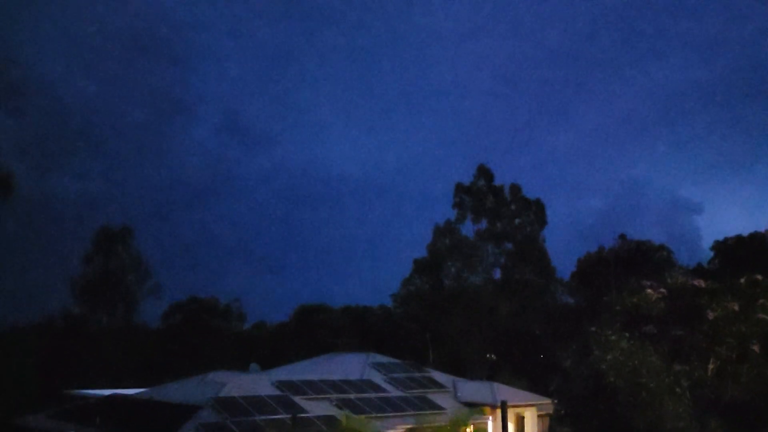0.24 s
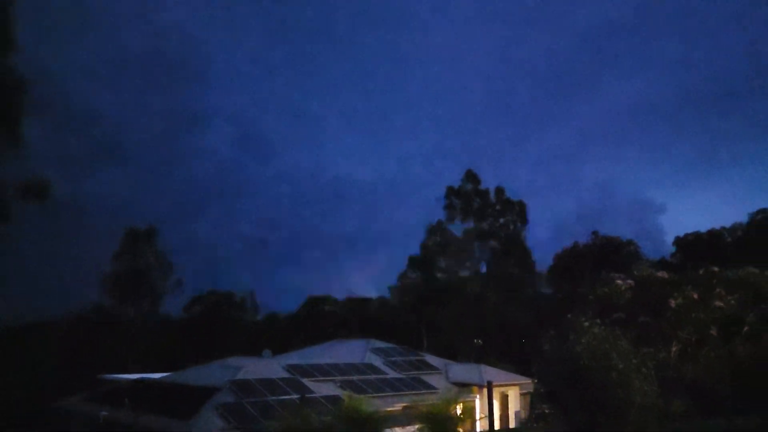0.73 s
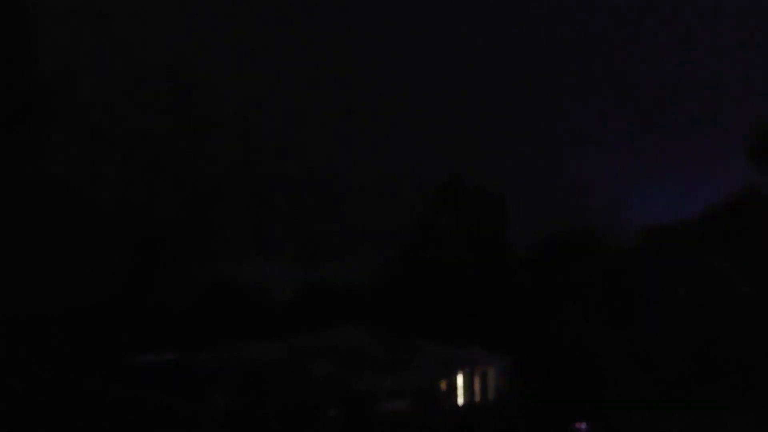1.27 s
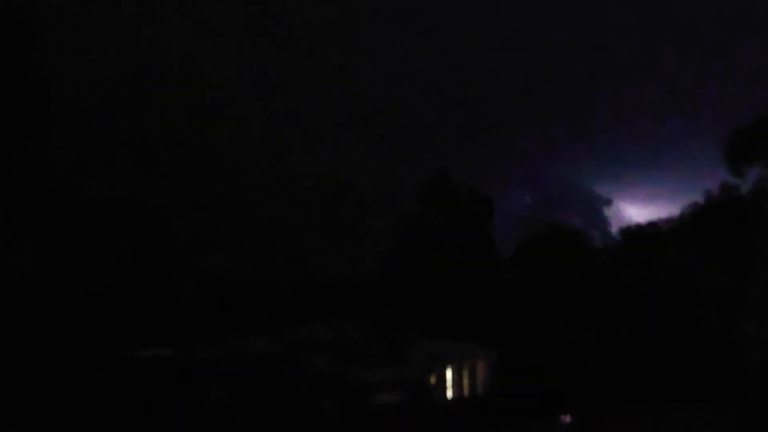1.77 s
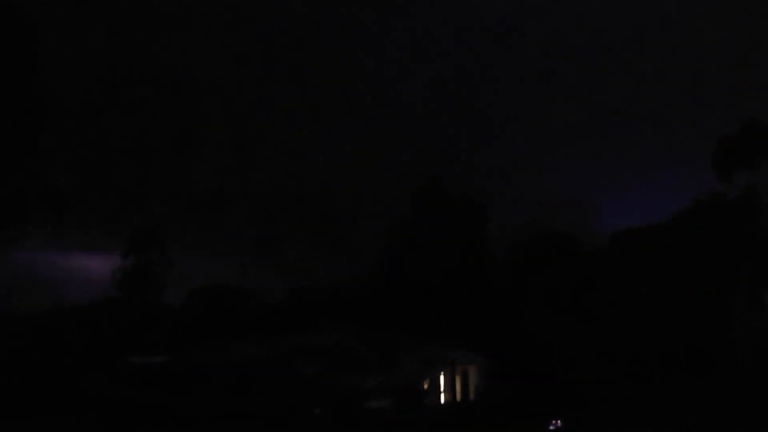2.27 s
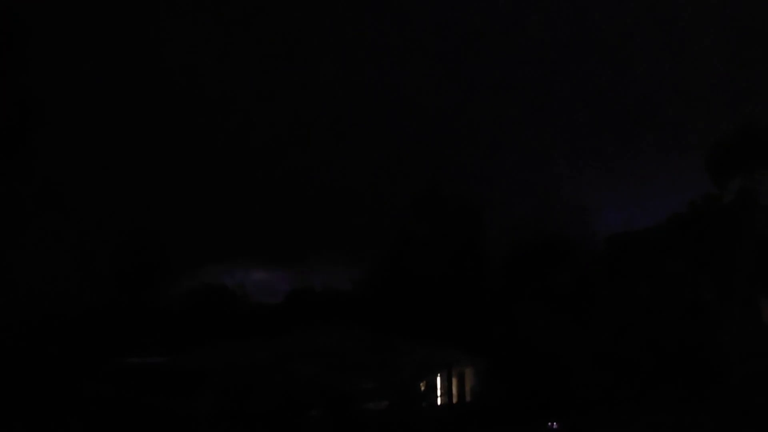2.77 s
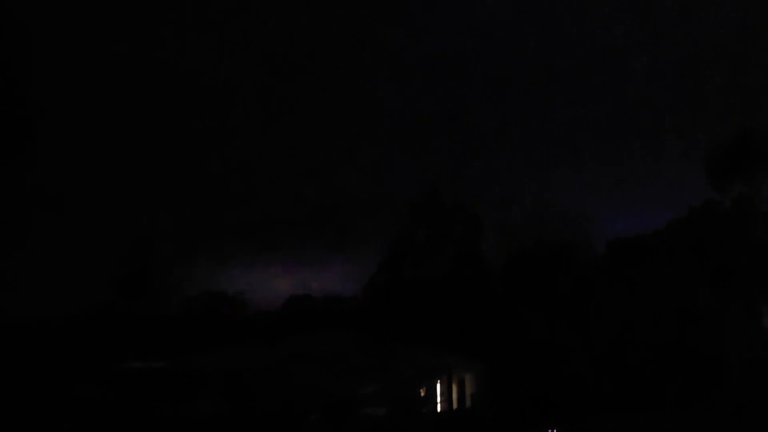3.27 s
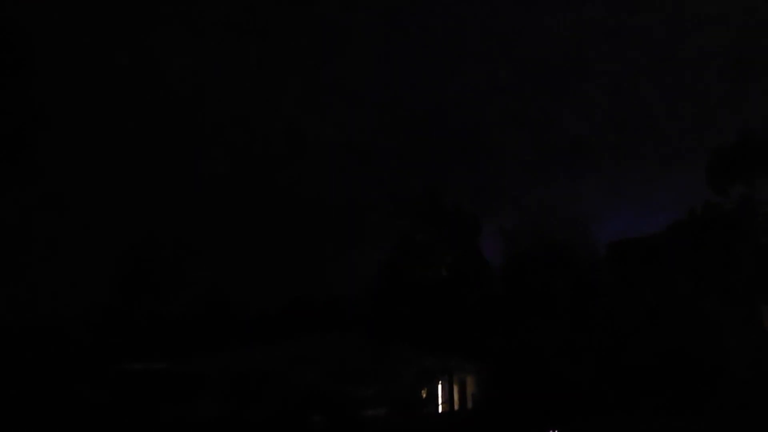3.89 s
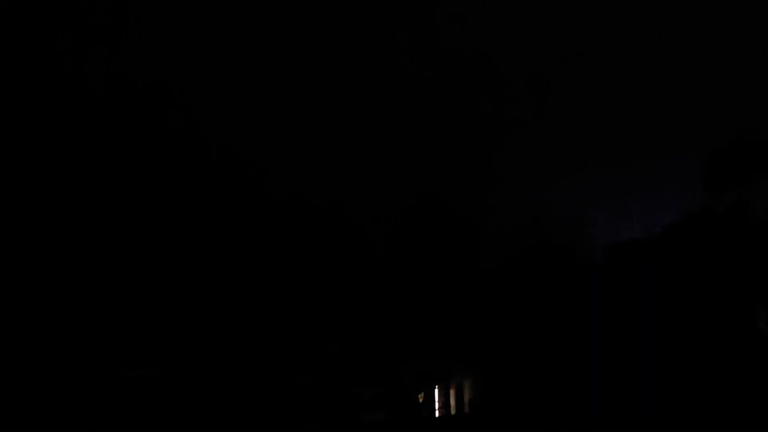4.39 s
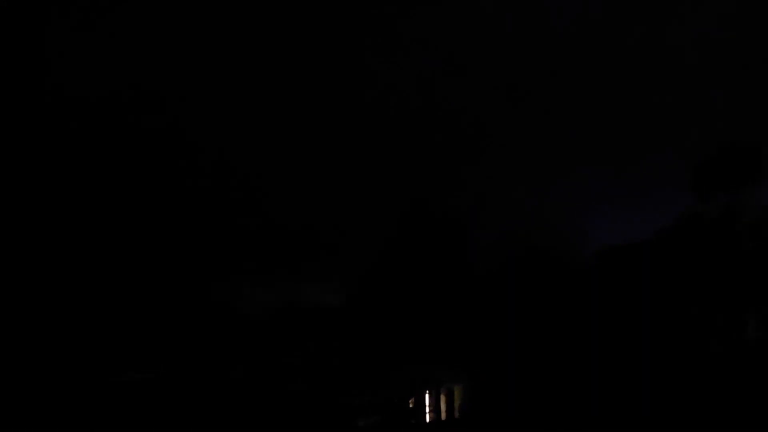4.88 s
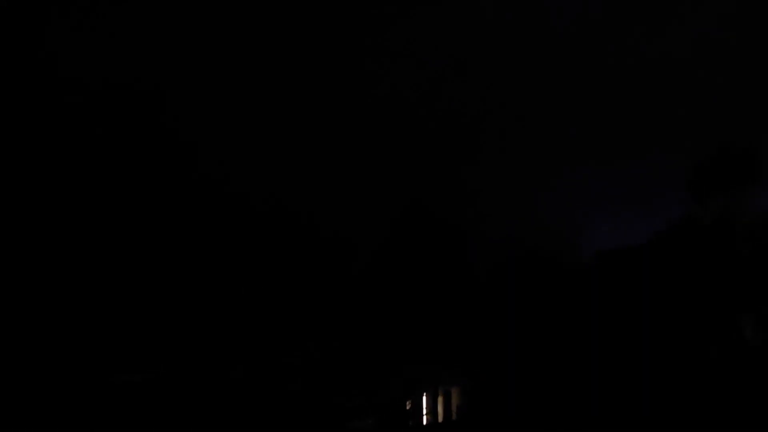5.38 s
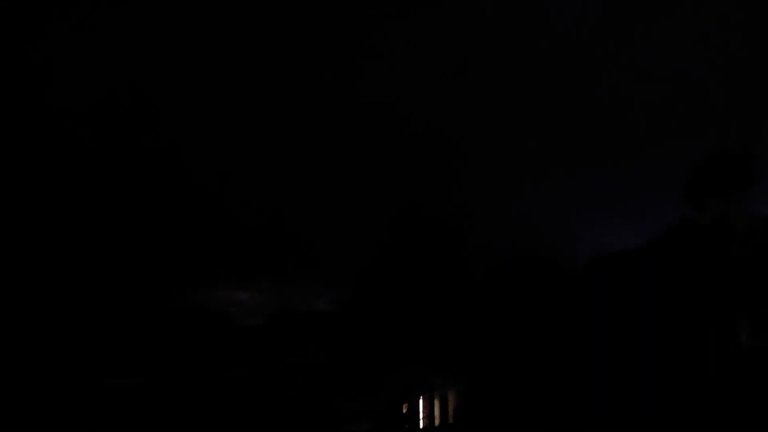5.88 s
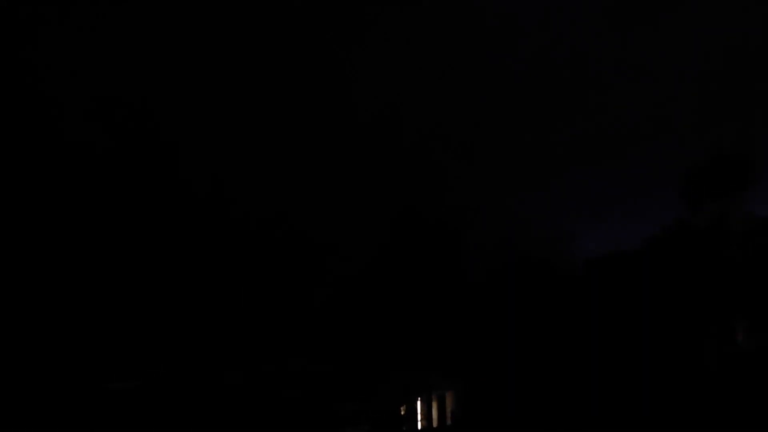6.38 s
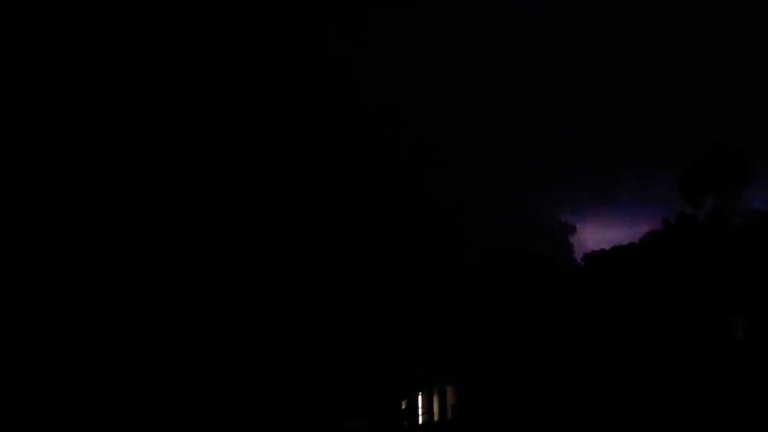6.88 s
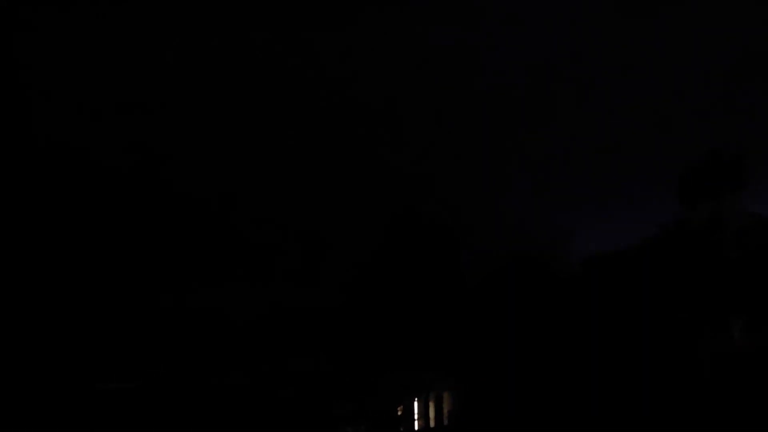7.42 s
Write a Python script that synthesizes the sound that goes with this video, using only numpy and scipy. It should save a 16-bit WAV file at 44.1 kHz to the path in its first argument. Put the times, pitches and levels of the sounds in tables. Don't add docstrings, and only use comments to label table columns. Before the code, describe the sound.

Outdoors at night, three near frogs trill dry falling whistles around 4 kHz, about fifteen chirps a second, with tiny hesitations. A far chorus fills in behind. Thunder rumbles low and continuous while wind thumps the hand-held microphone, harder on the right and strongest near the end. Cloth brushes, small knocks and a firmer bump past the middle come from handling. Insects hiss softly.

```python
import sys
import numpy as np
from scipy import signal
from scipy.io import wavfile
from scipy.ndimage import uniform_filter1d

SR = 44100
rng = np.random.default_rng(int(sys.argv[2]) if len(sys.argv) > 2 else 0)


def ratio_of_db(decibels):
    return 10 ** (np.asarray(decibels, float) / 20)


def transcribe(signal):
    frames = np.atleast_2d(signal).T
    limited = np.clip(frames, -1, 1)
    pcm = np.round(limited * 32767).astype(np.int16)
    wavfile.write(sys.argv[1], SR, pcm)


N = 337365


def evened(x):
    return x / np.sqrt(np.mean(x ** 2) + 1e-20)


def read(points, hz, order=1):
    rows = np.transpose(points)
    return np.interp(np.log(hz + 1), np.log(rows[0] + 1), rows[order])


def curve(rows, order=1):
    rows = np.transpose(rows)
    return np.interp(np.arange(N) / SR, rows[0], rows[order])


def swells(rows, rest_db):
    rise_share, edge_db = 0.46, -9.5
    t = np.arange(N) / SR
    power = ratio_of_db(2 * rest_db) * np.ones(N)
    for peak_s, db, length in rows:
        u = (t - peak_s) / (length * np.where(t < peak_s, rise_share, 1 - rise_share))
        power += ratio_of_db(2 * (db + edge_db * np.minimum(abs(u), 9) ** 1.35))
    return np.sqrt(power)


def add(mix, s, sound):
    part = mix[:, round(s * SR):][:, :sound.shape[1]]
    part += sound[:, :part.shape[1]]


def sides(pan_db):
    return ratio_of_db(np.array([[pan_db / 2], [-pan_db / 2]]))


def resonate(x, hz, width):
    turn = np.exp(2j * np.pi * np.cumsum(hz * np.ones(x.shape[-1])) / SR)
    r = np.exp(-np.pi * width / SR)
    return 2 * (turn * signal.lfilter([1 - r], [1, -r], x / turn)).real


def resonate_thrice(x, hz, width):
    return resonate(resonate(resonate(x, hz, width), hz, width), hz, width)


def bins(size):
    return np.fft.rfftfreq(size, 1 / SR)


def noise(spectrum_db, like, lead, patchy_db, flicker_db, size):
    frames, hz = 4 * N // size + 5, bins(size)
    a, b, c, d, patches = rng.standard_normal((frames, len(hz), 5)).T
    flicker = evened(uniform_filter1d(patches[0], size=3)) * np.reshape(flicker_db, (-1, 1))
    patches = evened(uniform_filter1d(uniform_filter1d(patches, size=8, axis=0), size=10, axis=1))
    same = np.clip(like * np.ones(len(hz)), 0, 1)[:, None]
    left = a + 1j * b
    late = np.exp(-2j * np.pi * hz * lead / SR)[:, None]
    right = same * left * late + np.sqrt(1 - same ** 2) * (c + 1j * d)
    z = np.array([left, right]) * ratio_of_db(spectrum_db[..., None] + patchy_db * patches + flicker)
    return evened(signal.istft(z, nperseg=size, noverlap=3 * size // 4)[1][:, :N])


def chirps(runs, rate, uneven_db):
    rows = []
    for first, last, db in runs:
        count = round((last - first) * rate) + 1
        rows += [(s, db) for s in np.linspace(first, last, count)]
    rows = np.array(rows)
    return rows + rng.standard_normal(rows.shape) * [.0004, uneven_db]


def trill(calls, hz, fall, length, second_db, third_db, pan_db, lead):
    click_db, click_s, click_hz = 2, .00008, 6800
    out = np.zeros((2, N))
    t = np.arange(round(length * SR) + 30) / SR - np.array([[0], [lead]]) / SR + min(lead, 0) / SR
    u = np.clip(t / length, 0, 1)
    attack = np.sin(np.pi / 2 * np.minimum(u / 0.21, 1)) ** 2
    release = np.sin(np.pi / 2 * np.minimum((1 - u) / 0.44, 1)) ** 1.24
    shape = attack * release
    slide = length * u ** 2.4 / 2.4
    shadow = ratio_of_db(np.array([[0], [-9]]))
    click = np.exp(-((t - .0045) / click_s) ** 2) * np.cos(2 * np.pi * click_hz * (t - .0045))
    burst = np.exp(-u / 0.15) * (u > 0) * np.minimum(u / 0.021, 1)
    for (s, db), (pitch, slope, phase, wobble) in zip(calls, rng.standard_normal((len(calls), 4))):
        turn = 2 * np.pi * (hz * (1 + .006 * pitch) * t - fall * (1 + 0.098 * slope) * slide + phase)
        high = ratio_of_db(second_db + 2.05 * wobble) * np.cos(2 * turn)
        high = high + ratio_of_db(third_db + 3.2 * slope) * np.cos(3 * turn)
        snap = ratio_of_db(second_db - 7 + 2.5 * pitch) * burst * np.sin(1.45 * turn)
        snap = snap + ratio_of_db(second_db + click_db + 4 * slope) * click
        overtones = shape ** 2.0 * ratio_of_db(1.5 - 6.3 * u) * high
        add(out, s, ratio_of_db(db) * sides(pan_db) * (shape * np.cos(turn) + shadow * (overtones + snap)))
    return out


def near_frogs():
    # first_chirp_s, last_chirp_s, level_db
    nearest_runs = [(0.0472, 0.516, -33), (0.5845, 1.0514, -33), (1.115, 1.516, -33), (1.5864, 1.724, -31),
                    (1.789, 2.2558, -33), (2.3214, 3.181, -33), (3.251, 3.715, -33.5),
                    (3.7814, 3.918, -35.5), (3.9828, 4.182, -33), (4.245, 4.5833, -33.5),
                    (4.649, 4.784, -34), (4.861, 5.663, -33.5), (5.73, 6.1982, -35), (6.2617, 6.658, -34.5),
                    (6.7268, 6.989, -35), (7.057, 7.387, -34), (7.4554, 7.59, -33)]
    right_runs = [(0.063, 0.207, -41), (0.275, 0.817, -40), (0.89, 1.383, -40), (1.452, 1.711, -40.5),
                  (1.782, 2.398, -40.5), (2.467, 3.037, -40), (3.106, 3.662, -40), (3.754, 4.094, -40),
                  (4.166, 4.448, -39), (4.517, 4.808, -40), (4.879, 5.161, -39.5), (5.272, 5.497, -38.5),
                  (5.571, 5.804, -41.5), (5.874, 6.391, -39.5), (6.456, 7.091, -40), (7.16, 7.58, -38.5)]
    bright_runs = [(0.046, 0.455, -48), (1.323, 1.928, -41), (1.06, 1.257, -47), (1.993, 2.259, -43.5),
                   (2.328, 2.592, -46), (2.661, 3.261, -40), (3.328, 3.722, -40.5), (3.789, 4.122, -38.5),
                   (4.188, 4.717, -39.5), (4.783, 5.12, -39.5), (5.509, 5.835, -41), (5.897, 6.343, -41),
                   (6.408, 6.73, -39), (6.795, 7.632, -39.5)]
    farther_runs = [(0.03, 0.374, -54), (0.451, 0.595, -51.5), (.763, 0.988, -51), (1.064, 1.478, -52),
                    (1.552, 1.697, -49), (1.768, 2.874, -50.5), (2.943, 3.912, -52), (3.975, 4.761, -49),
                    (4.82, 5.24, -48), (5.309, 5.667, -49)]
    faint_runs = [
        (1.33, 2.49, -64),
        (2.555, 3.723, -67),
        (3.798, 4.486, -53),
    ]
    # start_hz, total_fall_hz, length_s, second_harmonic_db, third_harmonic_db,
    # left_right_db, left_lead_samples
    voices = [
        (4293, 469, 0.01764, -22, -46, 1.5, 12.5),
        (4658, 667, 0.01705, -22.5, -37, -8, -14),
        (4200, 200, 0.0135, -8, -31, 3.5, 12.5),
        (4720, 340, 0.0147, -21.5, -52, -5, -2),
        (4690, 440, .016, -24, -52, -8, -7.5),
    ]
    paces = (15.0, 14.2, 15.3, 14.3, 14.6)
    uneven_db = (.9, .8, .6, 1.2, 1.1)
    runs = (nearest_runs, right_runs, bright_runs, farther_runs, faint_runs)
    out = np.zeros((2, N))
    for frog_runs, pace, spread_db, voice in zip(runs, paces, uneven_db, voices):
        out += trill(chirps(frog_runs, pace, spread_db), *voice)
    return out


def far_frogs():
    # chirps_per_s, start_hz, level_db, left_right_db, left_lead_samples
    chorus = [
        (16.24, 4450, -66, -15, -25),
        (13.66, 4150, -52.5, -13, 8.5),
        (14.6, 4200, -64, 2, 14.5),
        (14.83, 4500, -57, -9.5, -12.5),
        (16.2, 4300, -57, -6, 2.5),
        (12.97, 4400, -55, 0, 19.5),
        (13.68, 4450, -53, -8, 8),
        (32.46, 4550, -57.5, -5, -10.5),
        (14.6, 3800, -64, -7, 18.5),
    ]
    out = np.zeros((2, N))
    for rate, hz, db, pan_db, lead in chorus:
        drift = np.cumsum(rng.standard_normal((130, 2)), axis=0)
        times = np.cumsum(1 + .006 * drift[:, 0]) / rate - rng.random() / rate
        calls = [(s, db + 0.45 * d) for s, d in zip(times, drift[:, 1]) if 0 < s < N / SR]
        out += trill(calls, hz, 420, 0.0159, -14, -30, pan_db, lead)
    return out


def croaks():
    # calls_per_s, pulses_per_s, throat_hz, level_db
    croakers = [
        (6.1, 125, 2061, -77),
        (5.4, 88, 2141, -77),
        (6.9, 110, 2013, -78),
        (7.4, 70, 1720, -81),
        (3.1, 60, 707, -81.5),
    ]
    t, out = np.arange(N) / SR, np.zeros(N + 40)
    for rate, pulses, hz, db in croakers:
        wander = evened(uniform_filter1d(rng.standard_normal((2, N)), size=3000, axis=1))
        calling = 2 * np.pi * np.cumsum(rate * (1 + 0.237 * wander[0])) / SR
        burst = np.maximum(np.sin(calling + 6 * rng.random()) + 0.18, 0)
        clicks = np.diff(np.floor(np.cumsum(pulses * (1 + .15 * wander[1])) / SR), prepend=0)
        out[40:] += ratio_of_db(db) * evened(resonate(resonate(burst * clicks, hz, 210), hz, 210))
    return np.array([out[40:], np.roll(out, 18)[40:]]) * sides(1.6)


def yard(x):
    taps = np.zeros((2, SR // 2))
    at = np.arange(200, SR // 2 - 20, 20) + rng.integers(0, 20, (2, (SR // 2 - 201) // 20))
    np.put_along_axis(taps, at, rng.choice([-1., 1.], at.shape), 1)
    taps *= ratio_of_db(-60 * np.arange(SR // 2) / SR / 0.14)
    return signal.fftconvolve(x, taps / np.linalg.norm(taps[0]), axes=1)[:, :N]


def thunder():
    # pitch_hz, level_db (per Hz)
    rumble = [(12, -27), (20, -22), (38, -2), (86, 2), (140, -8.5), (162, -15), (203, -21), (248, -29.5),
              (319, -28), (400, -27), (520, -60), (880, -120)]
    # time_s, level_db
    loudness = [
        (0, -54),
        (2, -53),
        (4.4, -51.5),
        (6.3, -52.5),
        (7.65, -49),
    ]
    return ratio_of_db(curve(loudness)) * noise(read(rumble, bins(4096)), 0.93, 0.0, 1.3, 1.1, size=4096)


def wind():
    # pitch_hz, level_db (per Hz)
    gust_colour = [(15, -6.5), (35, 9.5), (70, 8), (130, -7), (250, -25), (500, -53), (900, -66)]
    # peak_s, level_db, length_s
    gusts = [(.3, -42.5, 0.28), (.6, -40.5, 0.1), (.8, -42.5, 0.58), (1.5, -47, 0.092),
             (1.66, -46.5, 0.093), (1.89, -46, 0.072), (2.44, -53, 0.14), (3.29, -53, 0.17),
             (3.68, -52, 0.092), (4.35, -48.5, 0.38), (4.85, -50, 0.043), (5.37, -40.5, 0.089),
             (5.53, -44.5, 0.21), (6.18, -50.5, 0.15), (6.6, -41, 0.25), (6.88, -33.5, 0.041),
             (7.01, -36, 0.09), (7.2, -42, 0.69), (7.37, -33, 0.15), (7.48, -46, 0.13)]
    steady = 0.8
    lumps = noise(read(gust_colour, bins(2048)), 0.92, 0, 3.6, 2.5, size=2048)
    power = uniform_filter1d((lumps ** 2).mean(0), size=4000)
    return swells(gusts, -59.5) * evened(lumps / power ** (steady / 2)) * sides(-8.0)


def motor_hum():
    # time_s, pitch_hz, level_db
    hum = [
        (0, 132.9, -73),
        (1.7, 136, -63),
        (2.75, 126, -63),
        (2.9, 131.5, -58),
        (4.2, 131.5, -59),
        (4.45, 125, -57.5),
        (4.9, 130, -58.5),
        (5.3, 129, -64.5),
        (6.3, 130.3, -61),
        (7.65, 133.4, -68),
    ]
    pitch = curve(hum)
    steady = np.sin(2 * np.pi * np.cumsum(pitch) / SR)
    rough = evened(resonate(rng.standard_normal(N), pitch, 3.0))
    return ratio_of_db(curve(hum, order=2)) * evened(steady + 0.4 * rough) * sides(-2.5)


def cloth():
    # start_s, length_s, level_db, lowest_hz
    brushes = [(.09, 0.042, -75, 6000), (0.223, .045, -78, 10000), (.375, .03, -77, 10000),
               (0.596, 0.067, -75, 10000), (2.684, .003, -70, 9000), (4.427, .004, -70, 9000),
               (5.099, .003, -70, 8500), (5.214, .003, -67, 12500), (5.935, .004, -66, 9000),
               (1.05, 0.04, -65, 7040), (2.04, 0.11, -67, 8950), (2.148, 0.11, -72, 10400),
               (2.648, 0.085, -75, 10000), (3.59, .04, -66.5, 7000), (3.735, 0.037, -58.5, 6440),
               (3.992, 0.17, -71, 10000), (4.284, 0.21, -70, 10000), (4.744, 0.078, -60, 4050),
               (4.818, 0.059, -63.5, 4200), (5.197, 0.053, -65.5, 10000), (5.462, 0.11, -58.5, 4020),
               (6.155, 0.035, -69, 8000), (6.3, 0.037, -72, 9000), (6.994, 0.056, -59.5, 5560),
               (7.435, 0.051, -73, 8000), (7.575, 0.031, -61.5, 7000)]
    out = np.zeros((2, N))
    port = signal.butter(6, 9000, fs=SR, output="sos")
    for s, length, db, low_hz in brushes:
        u = np.arange(round(1.2 * length * SR)) / (length * SR)
        hiss, snags = rng.standard_normal((2, 2, 15000))[:, :, :len(u)]
        stroke = np.sin(np.pi * (u / 1.2) ** 0.67) ** 2.0
        grit = hiss * stroke * ratio_of_db(1.3 * evened(uniform_filter1d(snags[0], size=150)))
        bright = signal.sosfilt(signal.butter(2, low_hz, "high", fs=SR, output="sos"), grit)
        dull = signal.sosfilt(port, bright) + ratio_of_db(-13 - 4 * (low_hz < 5000)) * bright
        add(out, s, ratio_of_db(db + 14.0) * sides(11.7) * dull)
    return out


def knocks():
    # start_s, level_db, body_hz, width_hz,
    # ring_s
    taps = [(.095, -67, 300, 250, .2), (.1, -64, 3000, 1000, .04), (.228, -61, 635, 70, .12),
            (.23, -66, 420, 200, .15), (.319, -56, 300, 300, .04), (.343, -64, 350, 250, .1),
            (.61, -59, 850, 550, .03), (1.17, -67, 1500, 100, .1), (1.38, -65, 1620, 100, .12),
            (1.675, -61, 1215, 70, .08), (2.93, -67, 1100, 120, .08), (3.2, -59, 310, 110, .25),
            (3.205, -65, 600, 300, .05), (3.228, -63, 520, 400, .06), (3.78, -60, 2200, 1800, .024),
            (4.38, -61, 750, 300, .04), (4.55, -62, 500, 500, .05), (4.78, -56, 1160, 800, .15),
            (5.372, -55, 650, 900, .13), (5.372, -60, 330, 200, .15), (5.41, -61, 380, 150, .1),
            (5.97, -61, 320, 200, .1), (6.16, -67, 2900, 1600, .05), (6.78, -59, 500, 500, .098),
            (6.87, -58, 200, 160, .15), (6.99, -56, 160, 140, .2), (4.95, -66, 260, 150, .4),
            (6.78, -65, 2900, 900, .06), (7.44, -62, 2770, 1600, .03)]
    # start_s, level_db
    bumps = [
        (5.107, -39),
        (5.145, -44.5),
        (5.162, -50.5),
        (5.18, -57),
        (5.2, -59),
        (5.235, -61.5),
    ]
    # level_db, pitch_hz, width_hz, ring_s
    case = [
        (0, 510, 300, 0.11),
        (-4, 165, 110, 0.07),
        (-9, 330, 220, .15),
        (-8, 780, 400, 0.14),
        (-17, 1250, 600, .12),
    ]
    # level_db, pitch_hz, width_hz, ring_s
    latch = [
        (-53, 1500, 900, 0.016),
        (-52, 2500, 1800, .01),
        (-64, 600, 300, 0.05),
    ]
    latch_s = 2.028
    lag, same = 16, .7
    hits = taps + [(s, db + mode_db, *mode) for s, db in bumps for mode_db, *mode in case]
    hits = hits + [(latch_s, *mode) for mode in latch]
    out = np.zeros((2, N))
    t = np.arange(9000) / SR
    for s, db, hz, width, ring in hits:
        rattle = rng.standard_normal((2, 9000))
        rattle[1] = same * rattle[0] + np.sqrt(1 - same ** 2) * rattle[1]
        blow = rattle * ratio_of_db(-60 * t / ring) + 1.66 * np.exp(-t / 0.00029)
        body = resonate_thrice(blow, hz, 1.16 * width)
        both = np.array([body[0], np.roll(body[1], lag)])
        add(out, s, ratio_of_db(db + 10.5) * both / abs(body).max() * sides(3.1))
    return out


def night_air():
    # pitch_hz, level_db (per Hz), left_right_db, left_right_likeness (0-1)
    air_colour = [(149, 2.5, 4, 1), (319, -10.5, 9.5, 0.9), (745, -7, 0, 0), (896, -14, 4, 0.57),
                  (1550, -14.5, 3, 0.33), (1884, -8, 1, 0), (2150, 0, 0.5, 0), (2443, -22.5, -4, 1),
                  (3500, -12, 6.5, 0), (3670, -6.5, 3.5, 0), (5640, -6, 7.5, 0.22), (5880, -9.5, -2.5, 0),
                  (8000, -7, 6, 0.24), (9200, -32.5, 10.5, 0.3), (15600, -26, 16, 0.6)]
    # time_s, level_db
    rustle = [
        (0, -2),
        (1.9, -1.5),
        (2.3, -1),
        (3.2, -1),
        (4.2, 1),
        (5.8, 3.5),
        (6.6, -.4),
        (7.65, 1),
    ]
    hz = bins(1024)
    tilt = np.array([[.5], [-.5]])
    colour = read(air_colour, hz) + tilt * read(air_colour, hz, order=2)
    flicker_db = 0.8 + 1.1 * (hz > 9300)
    air = noise(colour, read(air_colour, hz, order=3), 17.85, 1.88, flicker_db, size=1024)
    leaves = signal.sosfilt(signal.butter(8, 9400, "high", fs=SR, output="sos"), air)
    return ratio_of_db(-56.5) * (air + (ratio_of_db(curve(rustle)) - 1) * np.roll(leaves, -2, axis=1))


def katydid():
    # peak_s, level_db, length_s
    wing_swells = [
        (1.83, -59, 0.56),
        (3.41, -58, 0.62),
    ]
    rest_db = -69.5 + 1.16 * np.arange(N) / SR
    wings = evened(resonate_thrice(rng.standard_normal((2, N)), 8420, 1400))
    return swells(wing_swells, rest_db) * ratio_of_db(-3.5) * wings * sides(5.1)


def road():
    # peak_s, level_db, length_s
    passes = [
        (.02, -70.5, 1.15),
        (2.2, -72, 0.62),
        (3.8, -83, 0.28),
        (5.35, -76, .9),
        (6.86, -74.5, 0.57),
    ]
    return swells(passes, -84) * evened(resonate(resonate(rng.standard_normal((2, N)), 1250, 970), 1250, 970))


def scene():
    calls, low = near_frogs() + far_frogs(), croaks()
    frogs = calls + ratio_of_db(-14.5) * yard(calls) + low + ratio_of_db(2) * yard(low)
    storm = thunder() + wind() + motor_hum()
    return frogs + storm + cloth() + knocks() + night_air() + katydid() + road()


def muted(x):
    # pitch_hz, left_share (0-1), right_share (0-1)
    mute_share = [(800, 0, 0), (1000, .12, .12), (1550, .12, .12), (1750, 0, 0), (2300, 0, 0),
                  (2450, .13, .13), (3300, .13, .13), (3600, 0, 0), (9200, 0, 0), (9700, .18, .25),
                  (11300, .11, .35), (12300, 0, .12), (14000, 0, 0)]
    hz, _, z = signal.stft(x, SR, nperseg=1024, noverlap=768)
    band = np.floor(34 * np.log(1 + hz / 2500)).astype(int)
    _, first, which = np.unique(band, return_index=True, return_inverse=True)
    power = np.add.reduceat((abs(z) ** 2).sum(0), first, axis=0)
    power = np.repeat(uniform_filter1d(power, size=4, axis=1)[:, 2::4], 4, axis=1)[which]
    rank = power.argsort(axis=1, kind="stable").argsort(axis=1) / power.shape[1]
    share = np.array([read(mute_share, hz, order=1), read(mute_share, hz, order=2)])[..., None]
    keep = np.ones(z.shape)
    keep[..., :rank.shape[1]] = np.where(rank < share, ratio_of_db(-35), 1)[..., :z.shape[2]]
    return signal.istft(z * keep, SR, nperseg=1024, noverlap=768)[1][:, :N]


def low_pass(x):
    return signal.sosfilt(signal.butter(12, 15820, fs=SR, output="sos"), x)


def record(dry):
    cut = signal.sosfilt(signal.butter(1, 18, "high", fs=SR, output="sos"), dry)
    edge = signal.firwin(1023, 15770, window=("kaiser", 9), fs=SR)
    return low_pass(signal.oaconvolve(muted(cut), edge[None], "same", axes=1))


dry = scene()
out = record(dry)
transcribe(out)
```